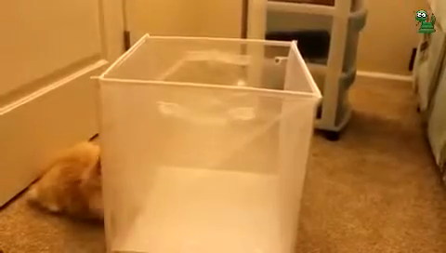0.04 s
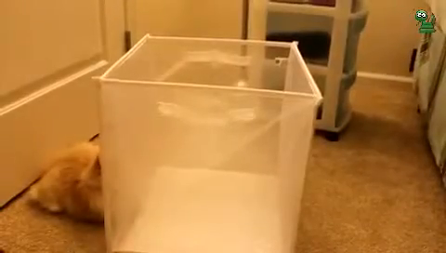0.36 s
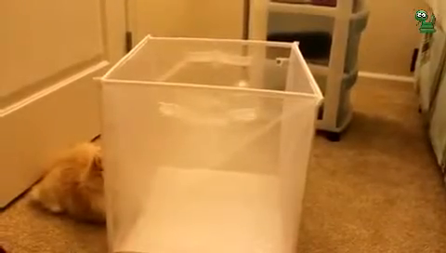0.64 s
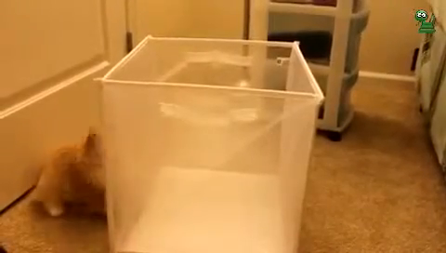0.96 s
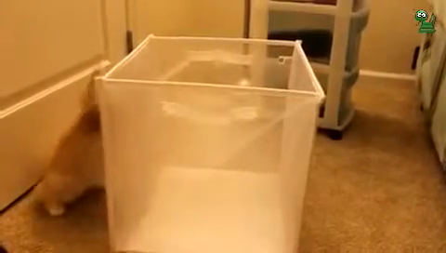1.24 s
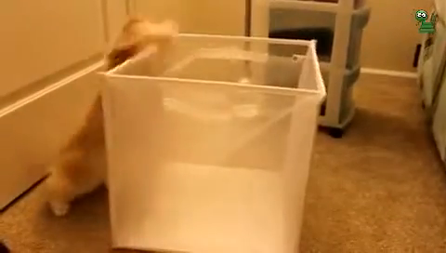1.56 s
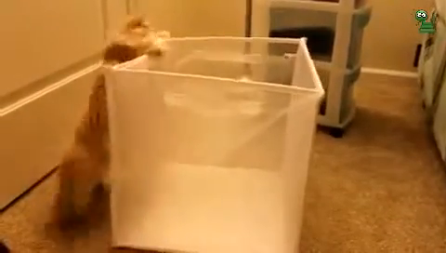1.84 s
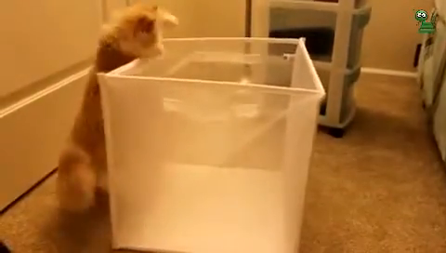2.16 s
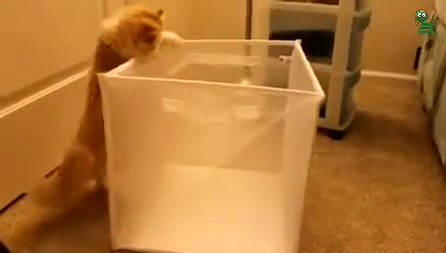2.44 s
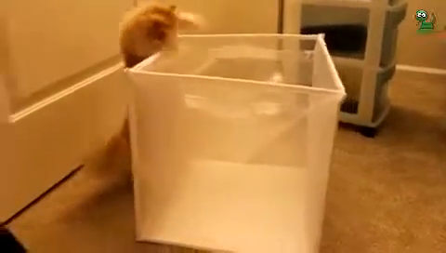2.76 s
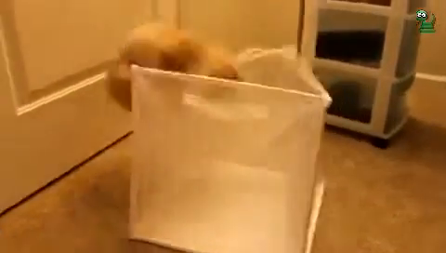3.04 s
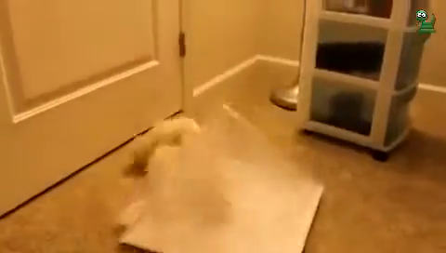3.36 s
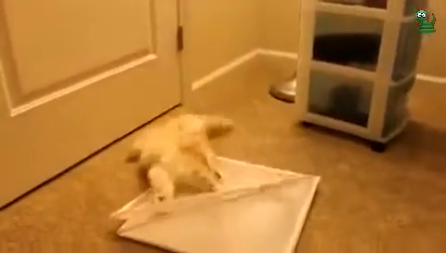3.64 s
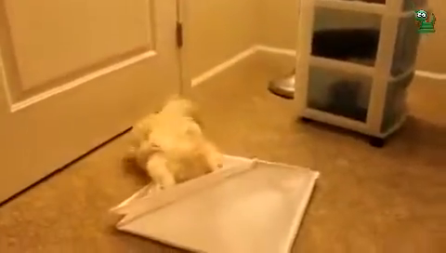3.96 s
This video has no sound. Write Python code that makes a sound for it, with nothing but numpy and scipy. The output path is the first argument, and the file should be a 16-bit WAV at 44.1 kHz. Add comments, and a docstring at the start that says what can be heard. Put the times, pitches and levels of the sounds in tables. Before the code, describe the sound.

Faint kitten claw ticks and scuffs, then a mesh cube crashes softly onto carpet.

```python
"""A small carpeted room with a steady ventilation rumble. A kitten paws at a mesh storage cube,
climbs the rim and brings it down. Paws knock softly, claws tick and scuff on the taut weave.
At about 3.3 s the panels slide and fold with a rasp, the wire frame rings,
and kitten and frame thump on the floor."""
import sys
import numpy as np
from scipy import signal
from scipy.fft import rfft, irfft
from scipy.io import wavfile

SR = 44100
rng = np.random.default_rng(int(sys.argv[2]) if len(sys.argv) > 2 else 0)


def wav_out(sig):
    """Save sig, one row per channel (or a flat mono array), as 16-bit PCM at SR to the path in sys.argv[1]."""
    wavfile.write(sys.argv[1], SR, np.round(np.clip(np.atleast_2d(sig).T, -1, 1) * 32767).astype(np.int16))


N = 176400
T = np.arange(N) / SR


def amp(db):
    """Decibels to gain."""
    return 10 ** (np.asarray(db) / 20)


def unit(x):
    """Scales to an rms of one."""
    return x / np.sqrt(np.mean(abs(x) ** 2) + 1e-20)


def curve_at(points, hz):
    """Reads a curve on a log-frequency axis."""
    f, value = np.transpose(points)
    return np.interp(np.log(hz + 1), np.log(f), value)


def fader(points):
    """Gain that rides (t/s, level/dB) points and is silent outside them."""
    s, db = np.transpose(points)
    return amp(np.interp(T, s, db, left=-150, right=-150))


def add(mix, s, sound):
    """Mixes a sound in at time s."""
    part = mix[round(s * SR):][:len(sound)]
    part += sound[:len(part)]


def eq(x, points, tilt_db=0):
    """Minimum-phase EQ, tilted per octave about 6 kHz."""
    hz = np.maximum(abs(np.fft.fftfreq(4096, 1 / SR)), 1)
    octaves = np.log2(np.maximum(hz / 6000, 1 / 8))
    log_gain = np.log(amp(curve_at(points, hz) + tilt_db * octaves))
    taps = np.fft.ifft(np.exp(np.conj(signal.hilbert(log_gain)))).real
    return signal.fftconvolve(x, taps[:len(taps) // 2])[:len(x)]


def cut(x, hz, kind):
    """High-, low- or band-pass."""
    return signal.sosfilt(signal.butter(3, hz, kind, fs=SR, output="sos"), x)


def grains(per_s, spread_db):
    """Random tiny slips of uneven size."""
    size = amp(spread_db * np.minimum(rng.exponential(1, N), 4))
    return size * rng.choice([-1, 1], N) * (rng.random(N) < per_s / SR)


def fuzzy_tone(hz, width_hz):
    """A narrow band of noise that follows a pitch."""
    noise = rng.standard_normal(N) + 1j * rng.standard_normal(N)
    carrier = np.exp(2j * np.pi * np.cumsum(hz * np.ones(N)) / SR)
    return unit((cut(noise, width_hz / 2, "low") * carrier).real)


def ring(drive, modes):
    """Shakes a set of modes; keeps the energy of the drive."""
    out, t = np.zeros(N), T[:SR // 2]
    for hz, db, t60 in modes:
        mode = amp(-60 * t / t60) * np.sin(2 * np.pi * hz * t)
        out += amp(db) * unit(signal.fftconvolve(drive, mode)[:N])
    return unit(out) * np.std(drive)


# spectrum of the moving air: f/Hz, relative level/dB
AIR_EQ = [(15, -52), (25, -37), (44, -9), (71, -19), (101, -4.5), (207, -6.5), (264, -3.5), (326, -7.5),
          (501, -11), (673, -15), (749, -9.5), (952, -15.5), (1210, -14.5), (2370, -23), (2630, -20.5),
          (4040, -26), (15000, -34.5)]
# fan tones: f/Hz, relative level/dB
FAN_TONES = [(274.5, -57.5), (479.1, -64.5), (823.6, -70), (1238, -65.5), (1583, -70.5), (2509, -72),
             (2546, -72.5), (2681, -72), (2923, -80), (3198, -67), (3542, -73.5)]


def ventilation():
    """The bed: a steady rush of air with faint, slightly wavering fan tones."""
    air_gain = amp(curve_at(AIR_EQ, np.fft.rfftfreq(N, 1 / SR)))
    air = unit(irfft(rfft(rng.standard_normal(N)) * air_gain, N))
    hum, steady_share = np.zeros(N), 0.81
    for hz, db in FAN_TONES:
        tone = unit(np.sin(2 * np.pi * hz * T))
        waver = fuzzy_tone(hz, width_hz=9.4)
        hum += amp(db) * unit(steady_share * tone + (1 - steady_share) * waver)
    return amp(-48) * air + amp(-0.5) * hum


# dull knocks and paw steps: t/s, level/dB, centre f/Hz, decay/s
PAW_KNOCKS = [(.14, -44.5, 193, 0.033), (.7, -43.5, 226, 0.051), (1.001, -45, 237, 0.027),
              (2.001, -43, 258, 0.022), (2.01, -45, 1930, 0.014), (2.145, -46, 328, 0.02),
              (2.72, -43.5, 766, 0.01), (2.875, -46, 1030, 0.0082), (3.1, -47.5, 1270, 0.025),
              (3.208, -40, 227, 0.02), (3.26, -43, 238, 0.0094), (3.312, -38.5, 606, 0.018)]


def paw_knocks():
    """Soft paws knock on carpet and cube, each a damped band of noise."""
    out, t = np.zeros(N), T[:SR // 3]
    attack_s, band_ratio = 0.0011, 1.46
    for s, db, hz, decay in PAW_KNOCKS:
        body = unit(cut(rng.standard_normal(len(t)), [hz / band_ratio, hz * band_ratio], "band"))
        envelope = np.minimum(t / attack_s, 1) * np.exp(-t / decay)
        add(out, s, amp(db) * body * envelope)
    return out


# snaps of claws and frame: t/s, dry peak level/dB, brightness/(dB per octave)
SNAP_HITS = [(.27, -33.5, 7), (.539, -31, 8), (0.755, -32, 6), (1.68, -34, 6), (1.772, -37, -1),
             (1.8082, -28, 0.5), (1.845, -29, -2), (1.864, -37, -3), (1.8745, -31, 2), (1.893, -31, 3),
             (2.1448, -27, 9), (2.145, -20, -3.5), (2.151, -30, 2), (2.64, -35.5, 5), (2.718, -31.5, 5),
             (2.902, -26, 8), (2.908, -34, 8), (3.0222, -27.5, -4.5), (3.037, -31, -2), (3.074, -27, 7),
             (3.097, -26, 3), (3.114, -22, 4), (3.202, -29, 3), (3.282, -25, 6), (3.286, -13, 10),
             (3.2944, -21.5, -3), (3.311, -21, -3), (3.3614, -2.5, 0.5), (3.3758, -17, -5),
             (3.6155, -28.5, 5), (3.9104, -24, 4.5)]
# tone of a snap: f/Hz, relative level/dB
SNAP_EQ = [(200, -19), (1000, -17), (2200, -6.5), (3500, -5), (5000, 2.5), (6400, 0.5), (7800, -8.5),
           (11000, -4.5), (15000, -9)]


def snaps():
    """A thread slips off a claw, or the frame flicks: a sharp click with a gritty tail."""
    out, t = np.zeros(N), T[:SR // 20]
    grit_decay_s = 0.0021
    for s, db, brightness in SNAP_HITS:
        grit = 0.2 * rng.standard_normal(len(t)) * np.exp(-t / grit_decay_s)
        crack = eq((t == 0) + grit, SNAP_EQ, brightness)
        add(out, s, amp(db) * crack / abs(crack).max())
    return out


# strokes over the mesh: peak t/s, rise/s, fall/s, level/dB
SCUFF_STROKES = [(1.36, .15, 0.26, -61.5), (1.555, 0.054, 0.083, -51.5), (1.695, 0.027, 0.038, -51.5),
                 (1.86, 0.056, 0.068, -53), (2.75, 0.034, 0.046, -55.5), (2.95, 0.075, .08, -52),
                 (3.09, 0.085, 0.11, -50), (3.22, 0.049, 0.046, -49), (3.97, 0.034, .04, -53)]
# tone of the brushed weave: f/Hz, relative level/dB
SCUFF_EQ = [(300, -18), (1200, -0.5), (2500, 2), (4000, 0.5), (6000, 0), (8000, -4), (11000, -4),
            (15000, -10.5)]


def scuffs():
    """Paws and fur brush the weave in grainy strokes that swell and fade."""
    power = np.zeros(N)
    for s, rise, fall, db in SCUFF_STROKES:
        width = np.where(T < s, rise, fall)
        power += (amp(db) * np.exp(-((T - s) / width) ** 2)) ** 2
    return np.sqrt(power) * unit(eq(grains(per_s=3500, spread_db=3), SCUFF_EQ))


# pitch and fader ride of the squeak: t/s, f/Hz, level/dB
SQUEAK_PATH = [(1.18, 10000, -73), (1.22, 10500, -64), (1.255, 10100, -63), (1.272, 10600, -73),
               (1.295, 11100, -64), (1.315, 11300, -78), (1.35, 11900, -65), (1.39, 11600, -76),
               (1.5, 11500, -73)]


def claw_squeak():
    """A claw drawn over the weave gives one thin, high squeak."""
    s, hz, db = np.transpose(SQUEAK_PATH)
    return fuzzy_tone(np.interp(T, s, hz), width_hz=350) * fader(np.transpose([s, db]))


# jerks of mesh over the wire rim: peak t/s, half-width/s, level/dB, centre f/Hz
RIM_SCRAPES = [(2.388, .006, -54, 3470), (3.281, 0.0027, -31.5, 3780), (3.341, 0.0013, -31, 4700),
               (3.359, 0.00073, -20, 5360), (3.3633, 0.003, -18, 6460), (3.364, 0.0029, -17, 13300),
               (3.411, 0.0075, -35.5, 1450), (3.417, 0.0034, -26.5, 2530), (3.47, 0.012, -32.5, 2000)]


def rim_scrapes():
    """The mesh catches on the rim and lets go in brief zips."""
    out, band_ratio = np.zeros(N), 1.35
    for s, width, db, hz in RIM_SCRAPES:
        slips = grains(per_s=14000, spread_db=1.3)
        scrape = unit(cut(slips, [hz / band_ratio, hz * band_ratio], "band"))
        out += amp(db) * scrape * np.exp(-((T - s) / width) ** 2 / 2)
    return out


# fader ride of the sliding mesh: t/s, relative level/dB
RASP_RIDE = [(3.255, -58), (3.283, -34.5), (3.325, -37.5), (3.351, -26.5), (3.361, -26.5), (3.369, -24.5),
             (3.441, -37.5), (3.497, -27), (3.527, -37.5), (3.64, -63.5)]
# tone of the rasp: f/Hz, relative level/dB
RASP_EQ = [(880, -42), (1500, 1.5), (4090, 0), (4500, 1.5), (4860, -2), (5400, 0), (9450, -4),
           (12700, -4.5), (15000, -8.5)]
# resonances of taut mesh and rim: f/Hz, relative level/dB, t60/s
MESH_MODES = [(4360, -5, .1), (4730, -2, 0.1), (5180, 8, 0.068), (6000, -1, .1), (6780, 2, 0.051),
              (7570, 7, 0.073), (8600, 9, 0.042), (10700, 12, 0.071), (12000, -3, .04), (14100, -3, .06)]


def mesh_rasp():
    """Mesh slides and crinkles over mesh as the cube falls, ringing the taut weave and rim."""
    slips = unit(grains(per_s=14000, spread_db=1.3))
    crinkles = amp(-7) * unit(grains(per_s=450, spread_db=2.5))
    rasp = unit(cut(eq(slips + crinkles, RASP_EQ), 2280, "high")) * fader(RASP_RIDE)
    return amp(2) * rasp + amp(-11.5) * ring(rasp, MESH_MODES)


# fader ride of the flapping panels: t/s, relative level/dB
FOLD_RIDE = [(3.262, -65), (3.288, -40), (3.322, -40.5), (3.352, -40), (3.362, -28.5), (3.417, -25.5),
             (3.429, -31), (3.488, -28), (3.54, -35), (3.68, -59.5)]
# tone of the panels: f/Hz, relative level/dB
FOLD_EQ = [(150, -37), (250, -16.5), (471, 0.5), (540, -2.5), (624, 0), (685, -1.5), (1460, 2), (3000, -9),
           (3900, -31), (6600, -120)]
# modes of the wire frame: f/Hz, relative level/dB, t60/s
FRAME_MODES = [(472, 6.5, 0.51), (629, 6, 0.12), (766, 7, 0.2), (850, 8, 0.16), (1133, 5, 0.27),
               (1210, 4, 0.16), (1445, -12, 0.22), (1500, 7, 0.11), (1770, 5, 0.083), (2510, -2, 0.13),
               (3310, 13.5, 0.11)]


def folding_panels():
    """The panels flap as they fold and shake the wire frame into ringing."""
    flaps = eq(grains(per_s=4000, spread_db=2.5), FOLD_EQ)
    fold = unit(cut(flaps, [280, 2690], "band")) * fader(FOLD_RIDE)
    return amp(-6) * fold + amp(-8) * ring(fold, FRAME_MODES)


# soft landings on the carpet: t/s, dry peak level/dB
LANDINGS = [(3.299, -44), (3.319, -40), (3.34, -38), (3.36, -30), (3.387, -30.5), (3.425, -25),
            (3.451, -26.5), (3.491, -35.5), (3.513, -34.5), (3.537, -41)]
# low-end weight of the floor: f/Hz, relative level/dB
FLOOR_EQ = [(30, -25), (50, 0), (65, -15), (112, 3), (140, -8.5), (200, -4), (300, -9), (600, -31),
            (2000, -77)]


def floor_thumps():
    """Kitten and frame land, each hit a soft push and a brief rumble of the floor."""
    out, t = np.zeros(N), T[:SR // 5]
    push_s, rumble_decay_s = 0.00091, 0.015
    for s, db in LANDINGS:
        push = (1 - t / push_s) * np.exp(-t / push_s)
        rumble = rng.standard_normal(len(t)) * np.exp(-t / rumble_decay_s)
        thump = unit(eq(push, FLOOR_EQ)) + 0.42 * unit(eq(rumble, FLOOR_EQ))
        add(out, s, amp(db) * thump / abs(thump).max())
    return out


# reverb time of the room: f/Hz, t60/s
ROOM_DECAY = [(100, 0.068), (500, 0.39), (2000, 0.21), (6000, 0.43), (15000, 0.095)]
# tone of the wall reflections: f/Hz, level/dB
WALL_EQ = [(200, -2.5), (3000, -3), (6500, 0.5), (9000, -4), (15000, 10)]


def room(x, send_db):
    """Adds the short reverb of a carpeted room: scattered reflections that fade band by band."""
    t = T[:SR // 2]
    density, predelay_s = 0.15, 0.003
    reflections = rng.choice([-1., 1.], len(t)) * (rng.random(len(t)) < density) * (t > predelay_s)
    hz, s, bands = signal.stft(reflections, SR, nperseg=256)
    decay = amp(-60 * s / curve_at(ROOM_DECAY, hz)[:, None])
    tail = signal.istft(bands * decay, SR)[1]
    response = eq(tail / np.linalg.norm(tail), WALL_EQ)
    return x + amp(send_db) * signal.fftconvolve(x, response)[:N]


def scene():
    """Mono mix: four groups, each with its own reverb send, over the ventilation bed."""
    bed = ventilation()
    paws = room(paw_knocks() + scuffs() + claw_squeak(), send_db=-6)
    ticks = room(snaps(), send_db=-8)
    cube = room(rim_scrapes() + mesh_rasp() + folding_panels(), send_db=-13.5)
    floor = room(floor_thumps(), send_db=-3)
    return (bed + paws + ticks + cube + floor)[None]


def record(dry):
    """A steep high cut at about 15 kHz."""
    high_cut = signal.firwin(601, 15080, window=("kaiser", 8), fs=SR)
    return signal.oaconvolve(dry, high_cut[None], "same")


dry = scene()
out = record(dry)
wav_out(out)
```